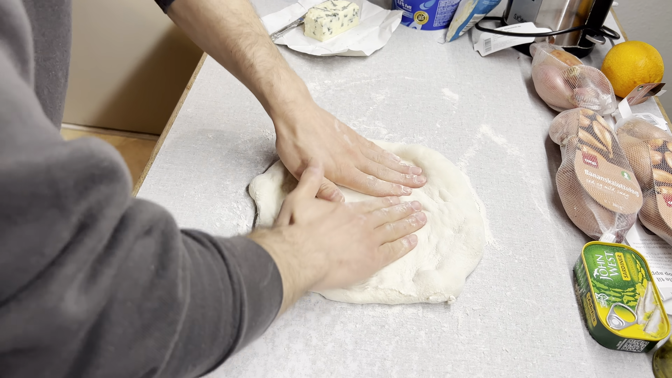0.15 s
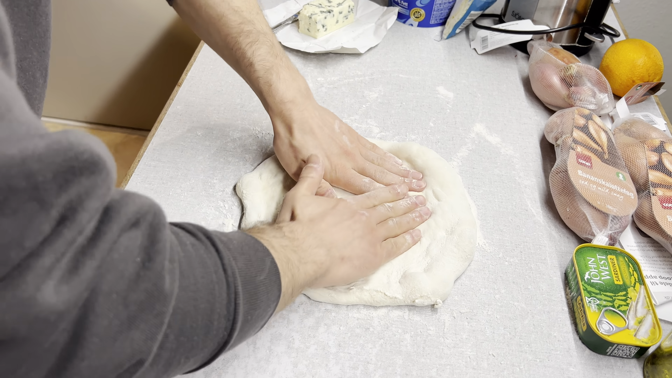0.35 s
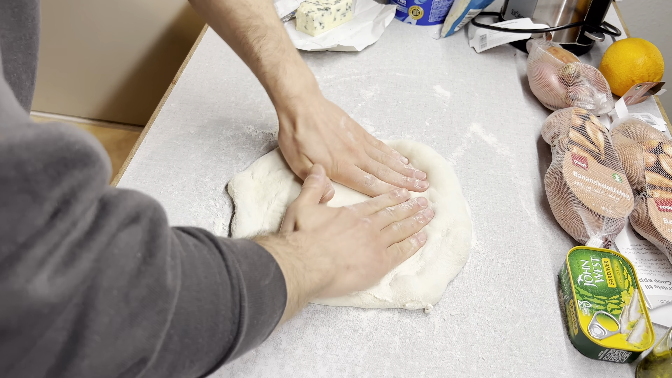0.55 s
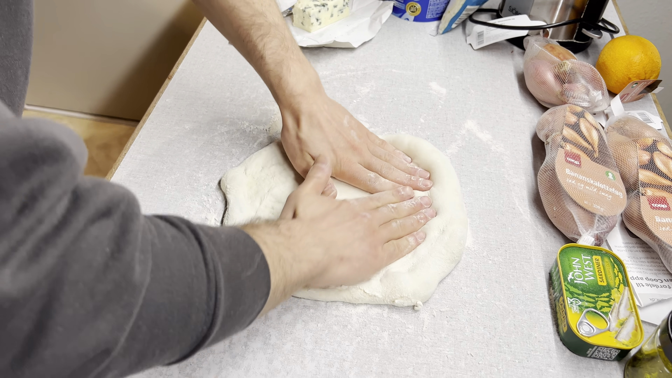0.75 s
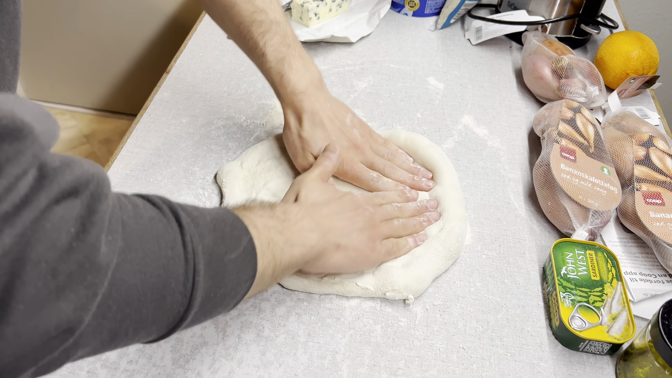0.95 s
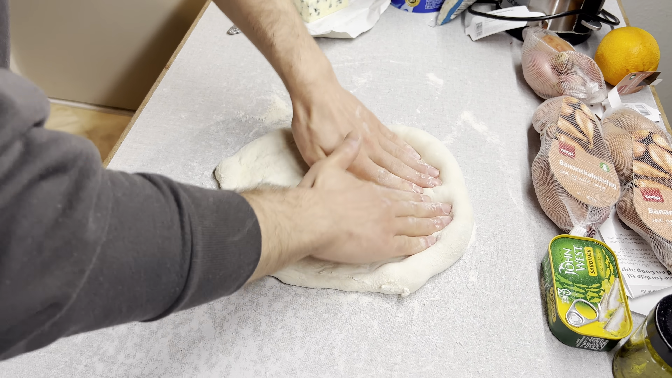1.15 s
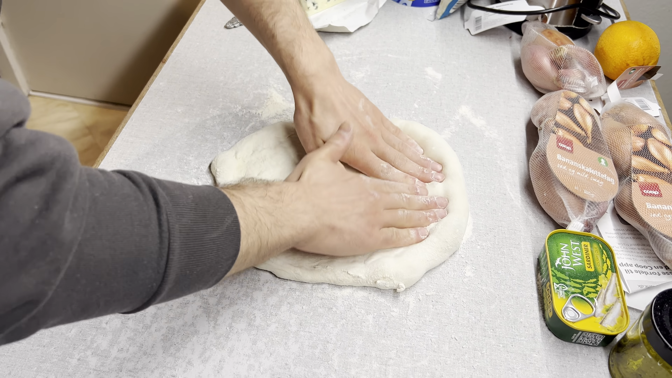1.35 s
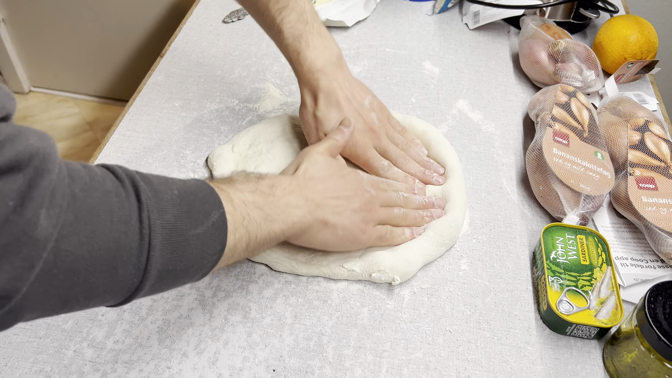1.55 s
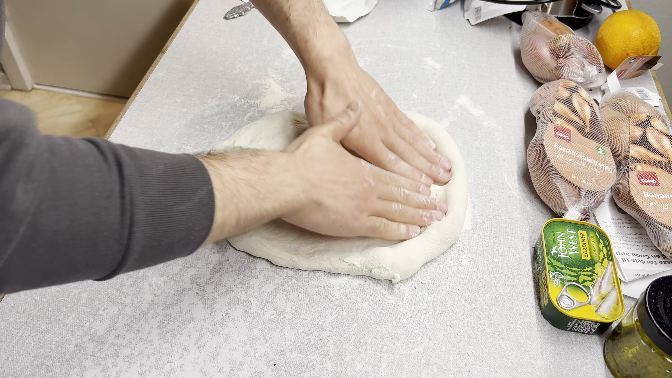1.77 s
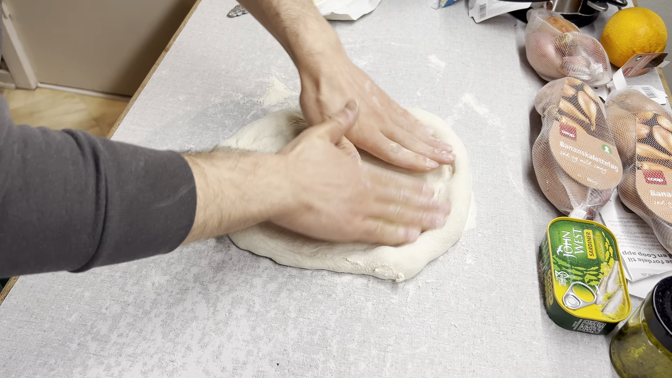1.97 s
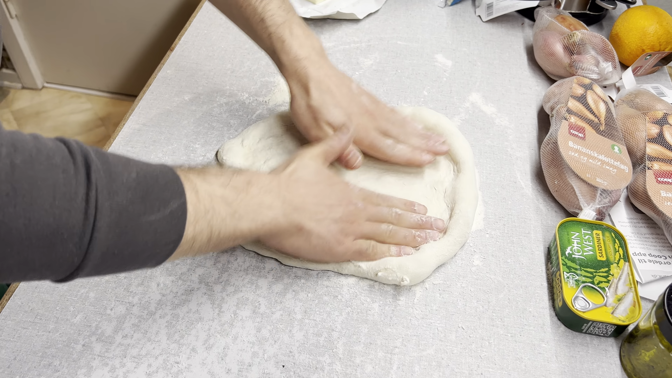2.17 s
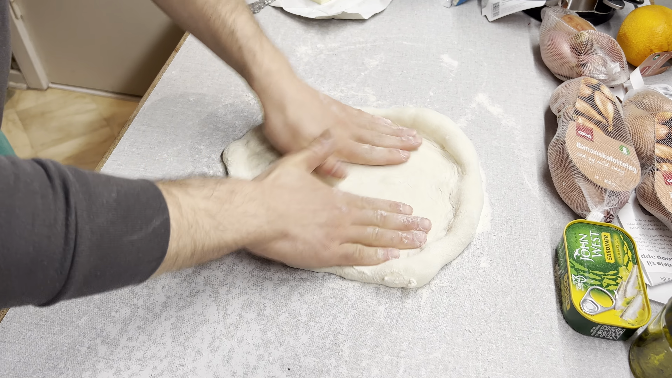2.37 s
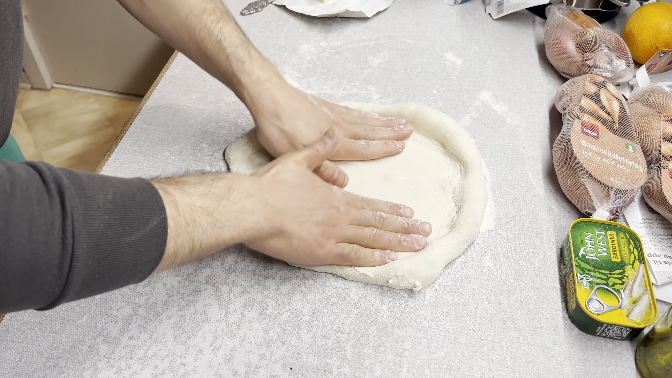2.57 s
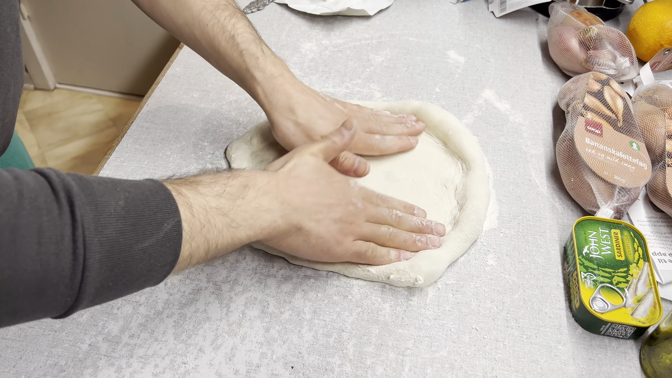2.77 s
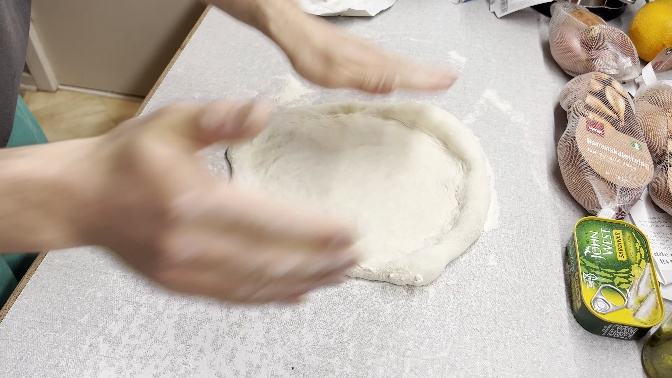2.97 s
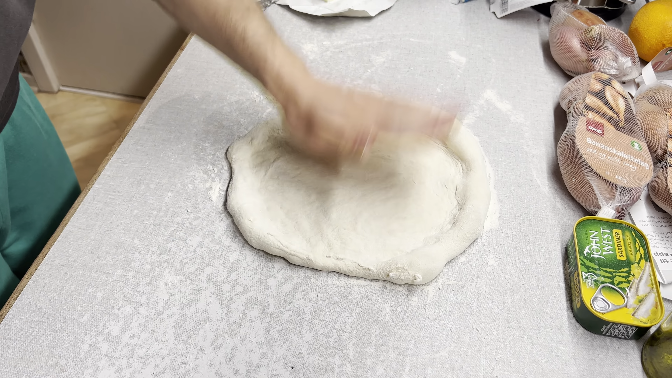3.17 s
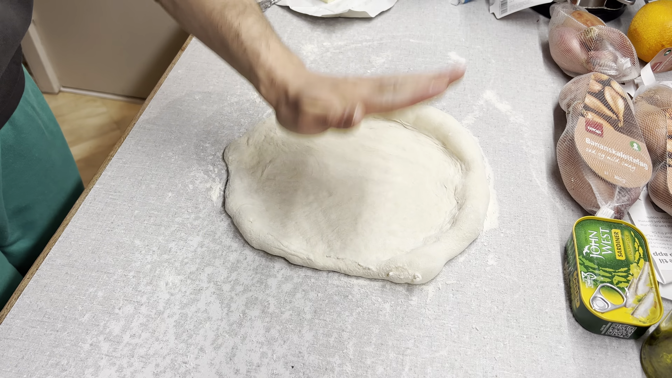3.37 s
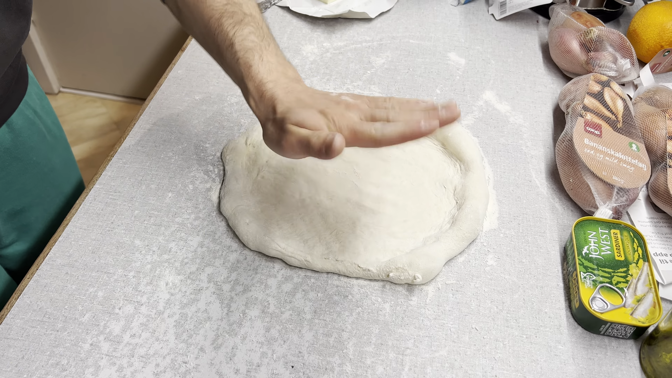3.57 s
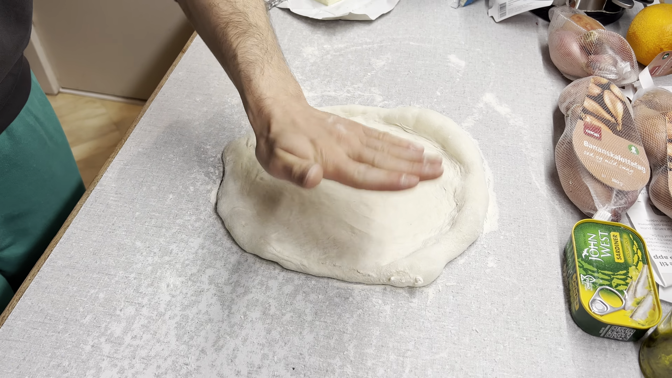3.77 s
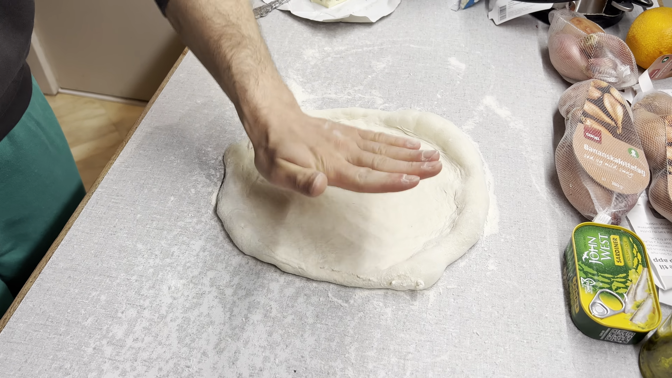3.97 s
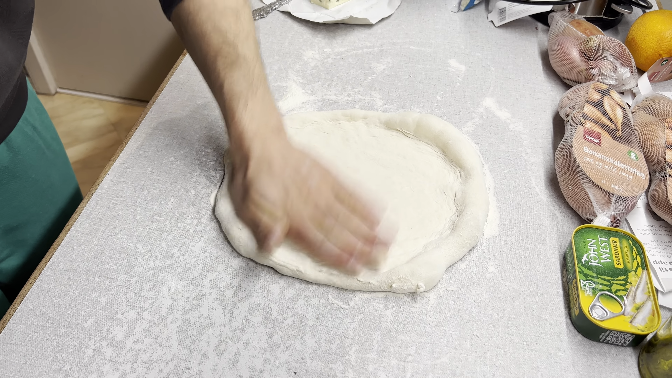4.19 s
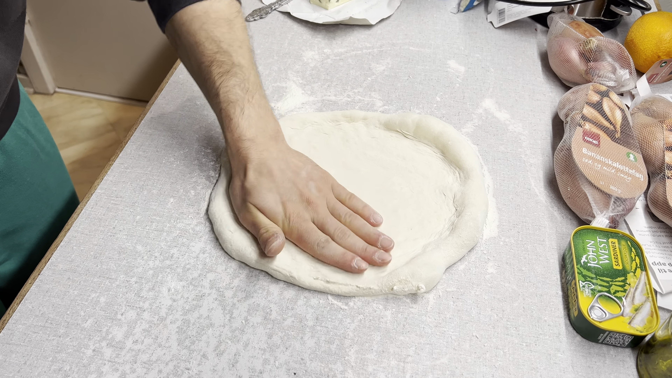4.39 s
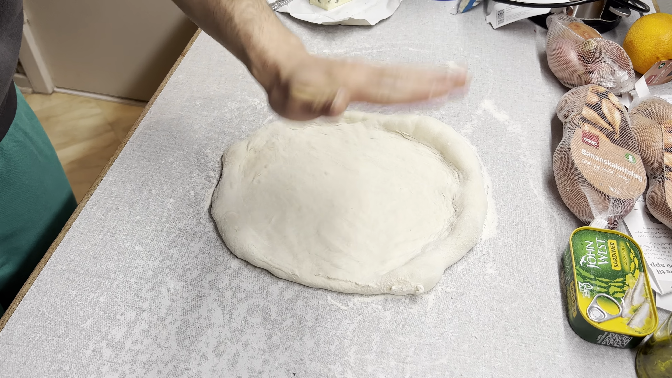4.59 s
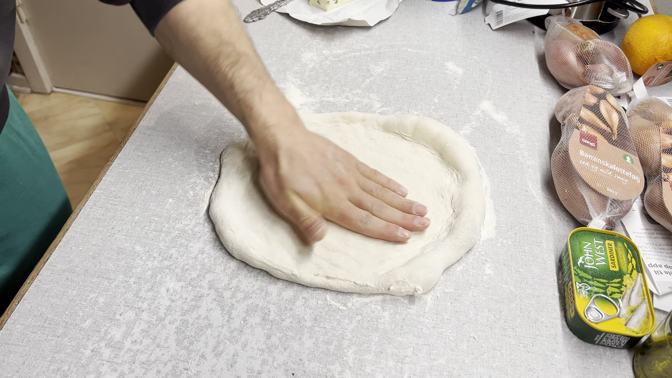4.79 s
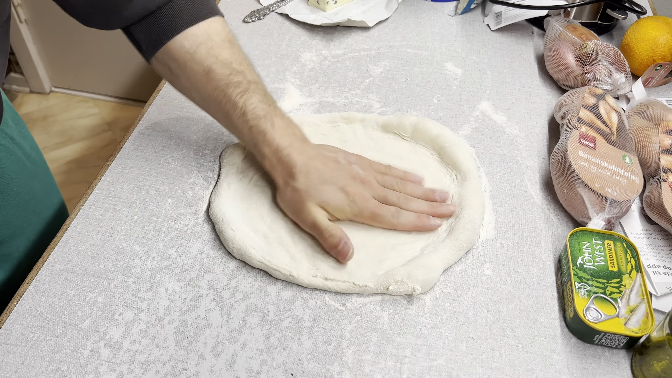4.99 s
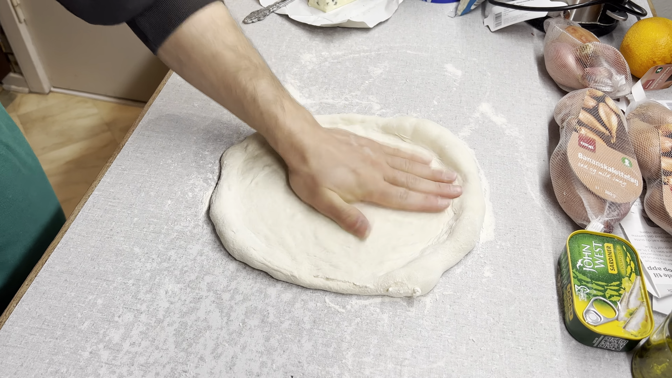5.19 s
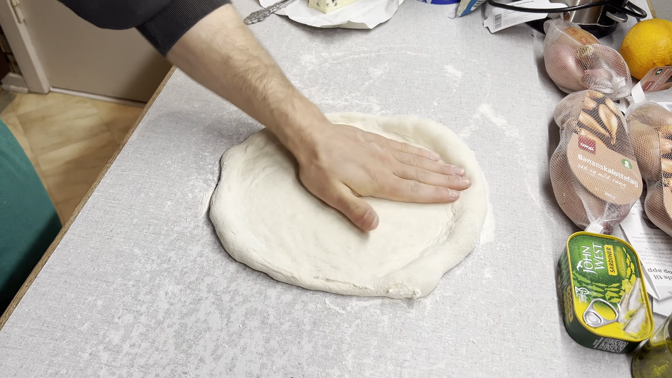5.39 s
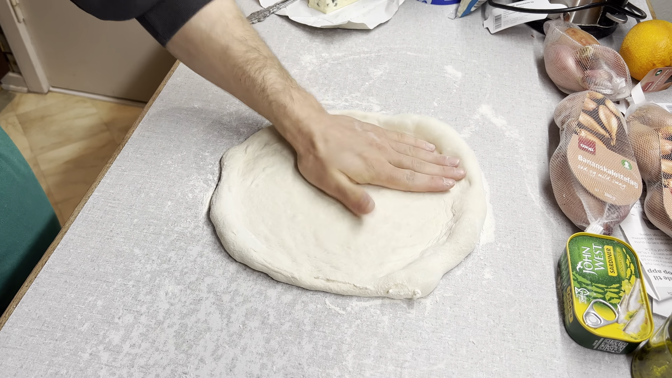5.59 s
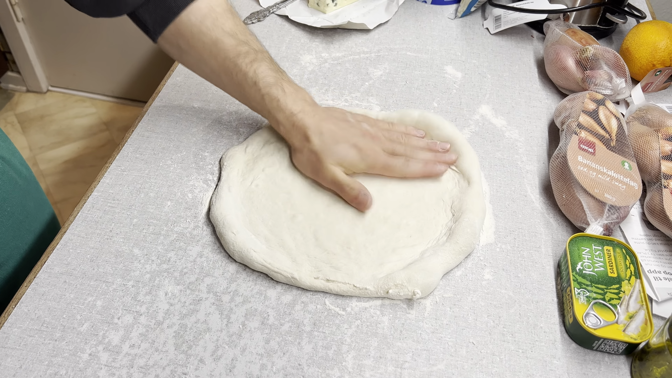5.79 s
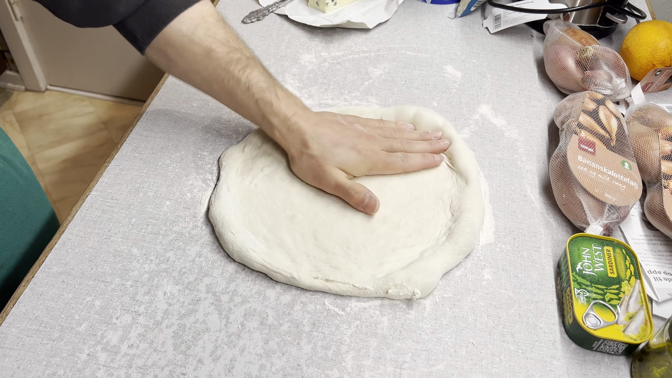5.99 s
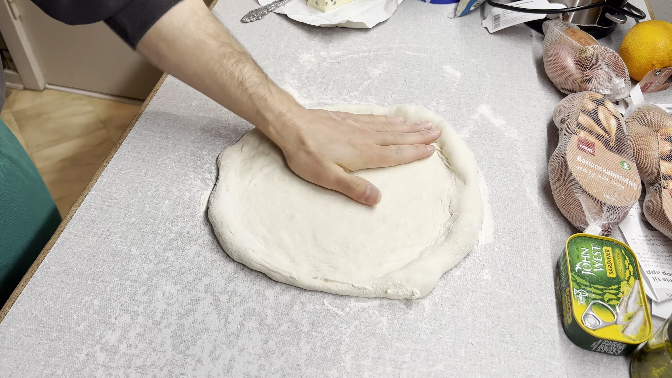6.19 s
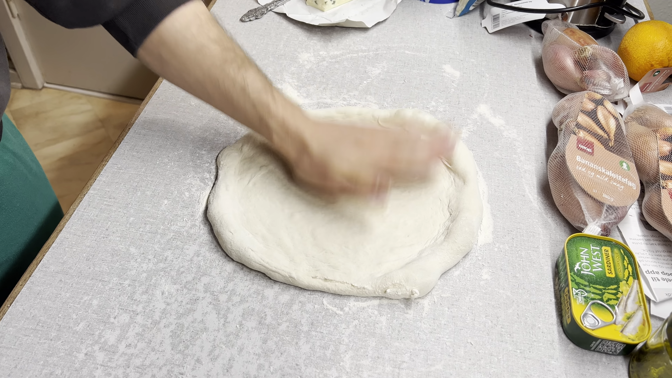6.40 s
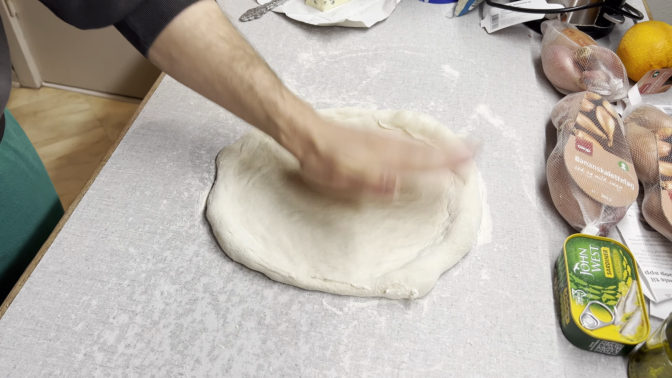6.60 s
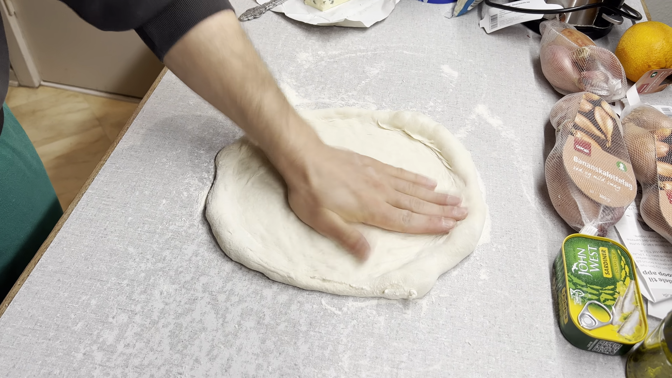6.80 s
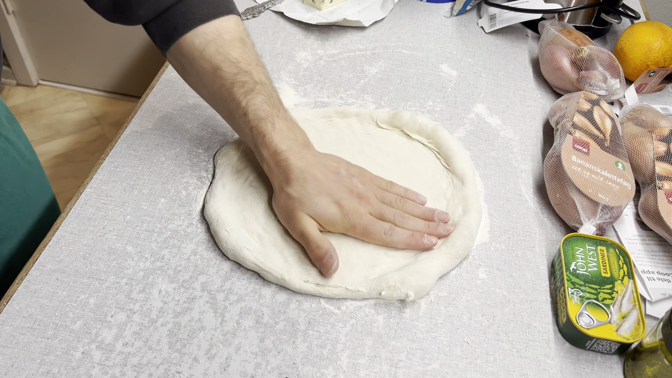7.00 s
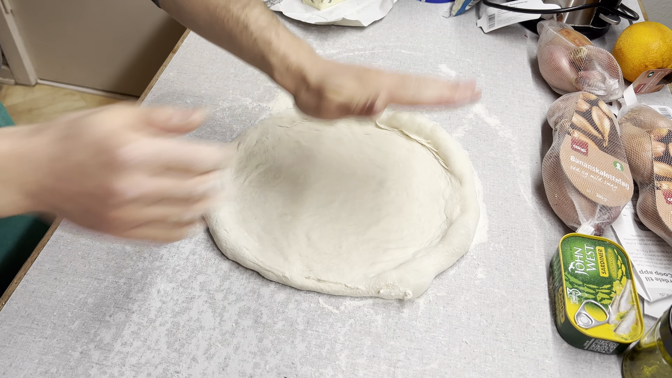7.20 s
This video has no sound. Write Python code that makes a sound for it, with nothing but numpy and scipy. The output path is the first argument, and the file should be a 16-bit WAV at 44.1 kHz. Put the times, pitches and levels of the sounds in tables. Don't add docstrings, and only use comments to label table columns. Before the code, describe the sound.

A close stereo phone pickup in a hard, lively home kitchen. A broad low appliance hum runs throughout. From 0.1 to 2.9 seconds fingertips pat soft dough roughly five times a second: quiet, rounded thuds with low wood and cabinet boom, small ticks, and a very faint dry hiss of flour. The pats firm up around 2.0 to 2.7, then nearly stop. At 3.2 a flat palm begins slapping, much louder: each blow is a sharp bright crack of escaping air, a short doughy smack and a woody thump, followed by a grainy room tail of under half a second. Seven slaps fall about 0.2 seconds apart until 4.36. After a short gap, a second run goes from 4.76 to 7.0, uneven in strength, with weaker hits near 6.6 and 6.8 and a strong last one. The hum swells slightly around 3.5, then drops well back during the slaps.

```python
import sys
import numpy as np
from scipy import signal
from scipy.fft import rfft, irfft
from scipy.io import wavfile
from scipy.ndimage import uniform_filter1d

SR = 44100
rng = np.random.default_rng(int(sys.argv[2]) if len(sys.argv) > 2 else 0)


def transcribe(signal):
    frames = np.atleast_2d(signal).T
    limited = np.clip(frames, -1, 1)
    pcm = np.round(limited * 32767).astype(np.int16)
    wavfile.write(sys.argv[1], SR, pcm)


def ratio(d):
    e = np.asarray(d, float) / 20
    return 10 ** e


N = 319725
TIME = np.arange(N) / SR
HZ = np.fft.rfftfreq(N, 1 / SR)

# (frequency [Hz], level [dB per Hz])
HUM_COLOUR = [(15, -74), (25, -33), (87, 2.5), (206, 0), (249, -2.5), (326, -0.5), (641, -4.5),
              (1160, -9.5), (1370, -9), (2110, -13.5), (6210, -25.5), (9070, -26.5), (10700, -33.5),
              (13200, -33), (16000, -73)]
# (frequency [Hz], width [Hz], level [dB])
HUM_PEAKS = [(94.2, 14.5, -41), (185.5, 11, -45.5), (1400, 57, -49.5), (1736, 26, -50), (6320, 160, -59)]
# (time [s], level [dB])
PHONE_GAIN = [
    (0, -3),
    (3.19, -4),
    (3.25, -3.5),
    (3.5, 1),
    (4.4, -12),
    (4.75, -16.5),
    (5.1, -12),
    (6.4, -14.5),
    (7.25, -14),
]
# (frequency [Hz], level [dB], time to fade by 60 dB [s])
KITCHEN = [(61.3, -7.5, 0.21), (119, -24, 0.51), (255, -7, 0.42), (470, -9.5, 0.42), (860, -9.5, 0.45),
           (2150, -20, 0.34), (4350, -29.5, 0.39), (6700, -23, 0.4), (8600, -29.5, 0.39),
           (13000, -47, 0.26), (16000, -53, .18)]
# (delay [s], level [dB])
WALLS = [(.0026, -11), (.0058, -18), (0.0095, -17), (0.015, -54)]
# (time [s], level [dB])
RUB = [(0, -68), (.7, -65), (1.05, -63), (1.5, -68), (2.15, -65), (2.5, -68), (2.85, -70), (3.0, -80)]
# (time [s], tick [dB], counter thump [dB], cabinet boom [dB], wood pitch under the fingers [Hz])
PATS = [(0.101, -32.5, -29.5, -35, 130), (0.3154, -36, -29, -26, 138), (0.376, -38, -40, -40, 200),
        (0.5186, -44, -57, -40, 110), (0.6978, -39, -38, -29, 115), (0.891, -42, -38.5, -34, 120),
        (1.0668, -35.5, -34, -38, 135), (1.2622, -36, -34, -32, 125), (1.4566, -28, -40, -31, 139),
        (1.6520, -42, -32, -29, 105), (1.7104, -45, -52, -41, 110), (1.8285, -50, -46, -32, 100),
        (2.009, -25.5, -26.5, -28.5, 149), (2.2005, -29, -28.5, -28, 135), (2.369, -26, -27, -24, 141),
        (2.536, -37, -33, -31, 150), (2.6961, -32, -28, -26, 158), (2.8693, -59, -41, -39, 105),
        (1.473, -52, -34.5, -42, 150), (2.3840, -30, -30, -32, 160), (2.7330, -40, -41, -42, 190)]
# (time [s], crack [dB], counter thump [dB], air pocket [Hz], wood pitch under the palm [Hz])
SLAPS = [(3.2056, -10.5, -15, 3420, 166), (3.43, -7.5, -10, 3000, 220), (3.6396, -6.5, -8.5, 2250, 172),
         (3.8409, -6.5, -17, 2100, 152), (4.0251, -8.5, -11, 3130, 182), (4.2112, -9.5, -11, 2230, 201),
         (4.3609, -10.5, -12.5, 1650, 185), (4.7634, -11, -15.5, 1920, 246), (4.9907, -6, -8, 2240, 180),
         (5.2023, -11.5, -11.5, 2930, 230), (5.3847, -13.5, -18, 2200, 165),
         (5.5879, -10.5, -20.5, 3900, 200), (5.7953, -8, -16, 2010, 160), (5.9825, -9, -14, 2060, 208),
         (6.1738, -11.5, -18, 2080, 194), (6.4306, -9, -10, 3170, 235), (6.6357, -20, -28.5, 4400, 135),
         (6.8121, -17, -24, 2270, 201), (6.999, -7, -14, 3900, 183)]
# (frequency [Hz], level [dB], time to fade by 60 dB [s])
FINGER_WOOD = [(112, -3, 0.34), (139, 15, 0.12), (149, -1.5, 0.14), (201.5, 24, 0.14), (280, -27, .08)]
# (frequency [Hz], level [dB], time to fade by 60 dB [s])
PALM_WOOD = [(136.5, -11.5, 0.37), (153.7, -8, 0.17), (202, 4.5, 0.15), (255.7, -5.5, 0.2),
             (292.4, 3, 0.075), (345, -14.5, 0.06)]
# (frequency [Hz], level [dB], time to fade by 60 dB [s])
CABINET = [(58, -8, 0.1), (62.6, 16, 0.21)]
# (frequency [Hz], level [dB])
CRACK_COLOUR = [(500, -33), (1500, 7), (2500, 5.5), (4000, 11), (6000, 3), (8500, 5.5), (12500, 0.5),
                (16000, -12)]
# (delay [s], level [dB])
BODY_REPEAT = (.0075, -8.5)
# (frequency [Hz], left minus right [dB])
NEAR_LEAN = [(60, 0.0), (110, 0.0), (200, -0.5), (380, -2.0), (700, 1.0), (1290, 0.5), (2380, -0.5),
             (4400, 5.0), (8120, 7.5), (15000, 0.0)]
# (frequency [Hz], how far left leads [radians])
NEAR_LEAD = [(0, 0), (600, 0.7), (1460, 0.3), (1980, -3.0), (2760, 2.3), (4400, 1.9), (5000, 3.1),
             (6550, 8.0), (8440, 3.3), (10100, -2.9), (12500, -5.7), (14300, -6.8), (16200, -9.2)]
# (frequency [Hz], left minus right [dB])
FAR_LEAN = [(60, 0.0), (110, -0.5), (200, 0.0), (380, -1.0), (700, 3.0), (1290, 2.0), (2380, 0.0),
            (4400, 4.0), (8120, 7.0), (15000, 0.0)]
# (frequency [Hz], how far left leads [radians])
FAR_LEAD = [(0, 0), (950, 1.4), (1890, 4.0), (3270, 2.0), (4220, 0.1), (6550, 8.0), (8270, 4.4),
            (9300, -1.7), (10400, -3.2), (11200, -3.4), (12500, -6.0), (14400, -6.4), (15600, -9.0),
            (16200, -9.0)]
# (frequency [Hz], likeness of left and right [-1 to 1])
FAR_ALIKE = [(60, 0.87), (130, 0.88), (290, 0.54), (640, 0.12), (1410, -0.1), (3100, -0.12), (6820, -0.03),
             (15000, 0.22)]


def on_hz(table):
    table = np.array(table, float)
    return np.interp(np.log(HZ + 1), np.log(table[:, 0] + 1), table[:, 1])


def on_time(table):
    return np.interp(TIME, *np.transpose(table))


def unit(x):
    return x / np.sqrt(np.mean(x ** 2))


def colour(x, table):
    return irfft(rfft(x) * ratio(on_hz(table)), N)


def band(x, hz, width):
    return signal.lfilter(*signal.iirpeak(min(hz, 0.45 * SR), hz / width, fs=SR), x)


def walk(rate):
    hold = int(SR / rate)
    steps = np.repeat(rng.standard_normal(N // hold + 1), hold)
    return unit(uniform_filter1d(uniform_filter1d(steps, hold), hold)[:N])


def ports(same, other, alike, lean_db, lead):
    alike = np.clip(alike, 0, 1)
    mid = rfft(same) * np.sqrt((1 + alike) / 2)
    side = rfft(other) * np.sqrt((1 - alike) / 2)
    turn = ratio(on_hz(lean_db) / 2) * np.exp(0.5j * np.interp(HZ, *np.transpose(lead)))
    return np.array([irfft((mid + side) * turn, N), irfft((mid - side) / turn, N)])


def hum():
    fields = []
    for _ in range(2):
        broad = ratio(-35) * unit(colour(rng.standard_normal(N), HUM_COLOUR))
        peaks = sum(ratio(db + walk(4.6)) * unit(band(rng.standard_normal(N), hz, width))
                    for hz, width, db in HUM_PEAKS)
        fields.append(broad + peaks)
    level_db_like = 0.17 * walk(2.3) + on_time(PHONE_GAIN)
    return ports(*fields, on_hz(FAR_ALIKE), FAR_LEAN, FAR_LEAD) * ratio(level_db_like)


def echo(blow_rows, spread_db):
    rows, room = np.array(blow_rows, float), np.array(KITCHEN)
    starts = (rows[:, 0] * SR).astype(int)
    heard_db = np.c_[rows[:, [3, 2, 4]], rows[:, 1:2] + spread_db]
    heard_hz = [60, 200, 800, 2500, 6000]
    patchy_db = rng.standard_normal((len(rows), 18))
    grain_db = walk(150)
    field = rng.standard_normal((2, N))
    wet = 0
    for k, hz in enumerate(45 * 2 ** np.arange(0, 8.6, 0.5)):
        room_db, t60 = (np.interp(np.log(hz), np.log(room[:, 0]), room[:, n]) for n in (1, 2))
        source_db = np.array([np.interp(np.log(hz), np.log(heard_hz), row) for row in heard_db])
        power = np.full(N, 1e-20)
        power[starts] = ratio(2 * (room_db + source_db + patchy_db[:, k]))
        build_s = 0.0081 * min(hz / 4000, 1) + 1 / hz
        rise = np.exp(-1 / (SR * build_s))
        fall = np.exp(-2 * np.log(1000) / (t60 * SR))
        power = signal.lfilter([1 - rise], [1, -rise - fall, rise * fall], power)
        noise = np.roll(field, 9000 * k, axis=1)
        noise = unit(band(band(noise, hz, hz / 2), hz, hz / 2))
        wet = wet + np.sqrt(np.abs(power)) * noise
    return ports(*wet * ratio(grain_db), np.sqrt(np.abs(on_hz(FAR_ALIKE))), NEAR_LEAN, FAR_LEAD)


def rub():
    hiss = unit(band(band(rng.standard_normal(N), 13000, 4500), 13000, 4500))
    wisps_db = on_time(RUB) + 2.8 * walk(21.4)
    return hiss * ratio(wisps_db) * (TIME < 3.1)


def ring(modes, detune, sway_db, t, push_s):
    free = 0
    for (hz, db, t60), shift, sway in zip(modes, detune, sway_db):
        fade = np.exp(-np.log(1000) * t / t60)
        free = free + ratio(db + sway) * np.sin(2 * np.pi * hz * (1 + shift) * t) * fade
    x = signal.fftconvolve(free, np.hanning(int(push_s * SR) + 3))[:len(t)]
    return x / np.abs(x).max()


def blows(rows, wood, wood_hz, push_s, pocket_gain_db, smack_s, boom_s):
    crack, body = np.zeros(N + SR), np.zeros(N + SR)
    t = np.arange(SR // 4) / SR
    short = t[:1024]
    crack_s = 0.0012
    for (s, crack_db, thump_db, boom_db, smack_db, pocket_hz), thud_hz in zip(rows, wood_hz):
        i = int((s + 0.00097) * SR)
        burst = rng.standard_normal(1024) * (short / crack_s) ** 2 * np.exp(2 - 2 * short / crack_s)
        pocket = band(burst, pocket_hz, 0.29 * pocket_hz)
        crack[i:i + 1024] += ratio(crack_db) * unit(burst + ratio(pocket_gain_db) * pocket)
        brush = band(rng.standard_normal(256), 4900, 6600) * np.linspace(0.3, 1, 256)
        crack[i - 256:i] += ratio(crack_db - 3.5) * brush

        j = i + int(0.002 * SR)
        press = (short / smack_s) * np.exp(1 - short / smack_s)
        smack = band(rng.standard_normal(1024) * press, 707, 360)
        body[j:j + 1024] += ratio(smack_db + 6.5) * smack / np.abs(smack).max()
        away_oct = np.abs(np.log2(np.array(wood)[:, 0] / thud_hz))
        favour_db = rng.standard_normal(len(wood)) - 11.2 * away_oct
        thump = ring(wood, rng.standard_normal(len(wood)) / 40, favour_db, t, push_s)
        body[j:j + len(t)] -= ratio(thump_db + 9) * thump
        detune, sway_db = rng.standard_normal((2, len(CABINET))) * [[1 / 20], [2]]
        body[j:j + len(t)] -= ratio(boom_db + 5) * ring(CABINET, detune, sway_db, t, boom_s)
    crack = crack + sum(ratio(db) * np.roll(crack, int(lag * SR)) for lag, db in WALLS)
    repeat_s, repeat_db = BODY_REPEAT
    body = body + ratio(repeat_db) * np.roll(body, int(repeat_s * SR))
    return ratio(-16) * colour(crack[:N], CRACK_COLOUR) + body[:N]


def pats():
    s, tick_db, thump_db, boom_db, wood_hz = np.transpose(PATS)
    pocket_hz = 3900 * 2 ** (-1.5 * (tick_db - tick_db.mean()))
    smack_db = thump_db - 36 + 10.5 * s
    rows = np.c_[s, tick_db, thump_db, boom_db, smack_db, pocket_hz]
    sound = blows(rows, FINGER_WOOD, wood_hz, push_s=0.0055, pocket_gain_db=-8, smack_s=0.003, boom_s=0.024)
    return sound, rows, np.zeros((len(rows), 2))


def slaps():
    s, crack_db, thump_db, pocket_hz, wood_hz = np.transpose(SLAPS)
    heavy_db = thump_db + 14
    weight_db = thump_db - crack_db
    smack_db = -19.5 + 0.87 * heavy_db
    boom_db = -19.5 + 0.73 * heavy_db + 7.5 * np.abs(np.log2(wood_hz / 200))
    throw_mid_db = 3 + 0.33 * weight_db
    throw_top_db = -1.3 + 0.46 * weight_db + 5.5 * np.log2(pocket_hz / 2400) - 1.1 * (s - s.mean())
    rows = np.c_[s, crack_db, thump_db, boom_db, smack_db, pocket_hz]
    sound = blows(rows, PALM_WOOD, wood_hz, push_s=0.0022, pocket_gain_db=8.6, smack_s=0.0028, boom_s=0.026)
    return sound, rows, np.c_[throw_mid_db, throw_top_db]


def scene():
    pat_sound, pat_rows, pat_throw_db = pats()
    slap_sound, slap_rows, slap_throw_db = slaps()
    hand = slap_sound + pat_sound + rub()
    direct = ports(hand, 0 * hand, 1, NEAR_LEAN, NEAR_LEAD)
    wet = echo(np.r_[slap_rows, pat_rows], np.r_[slap_throw_db, pat_throw_db])
    return direct + wet + hum()


def band_limit(x):
    return signal.sosfilt(signal.butter(12, 16640, fs=SR, output="sos"), x)


def record(dry):
    x = signal.sosfilt(signal.butter(6, 44, "high", fs=SR, output="sos"), dry)
    x = x - 0.69 * band(x, 10580, 3900)
    x = x - 0.45 * band(x, 7600, 700)
    x = 0.97 * np.tanh(x / 0.97)
    return band_limit(x)


dry = scene()
out = record(dry)
transcribe(out)
```